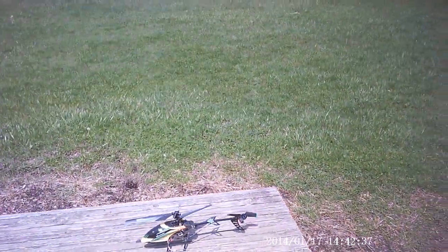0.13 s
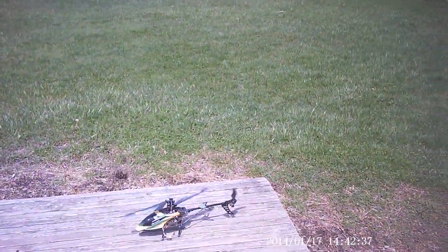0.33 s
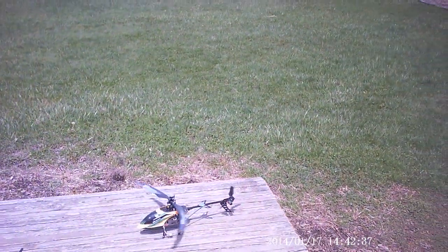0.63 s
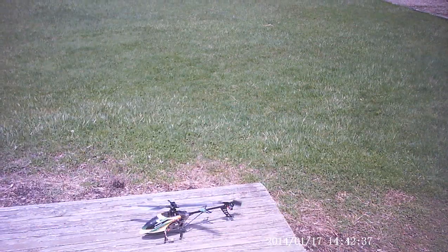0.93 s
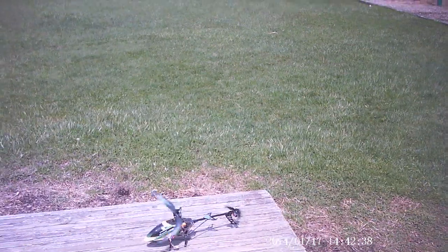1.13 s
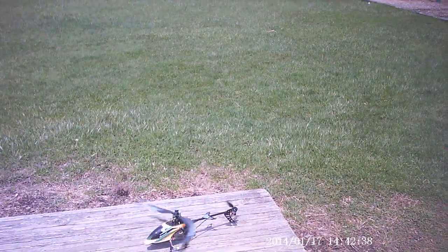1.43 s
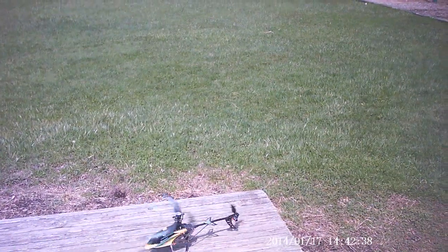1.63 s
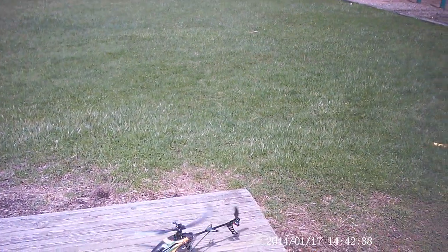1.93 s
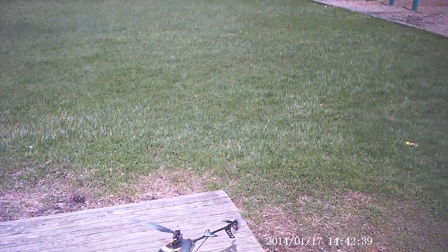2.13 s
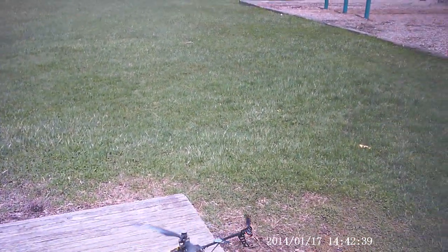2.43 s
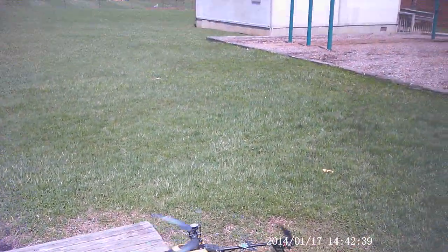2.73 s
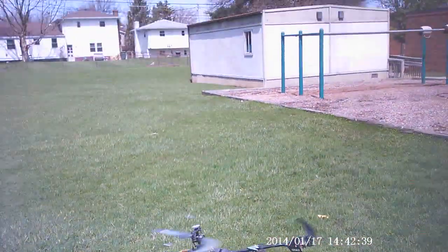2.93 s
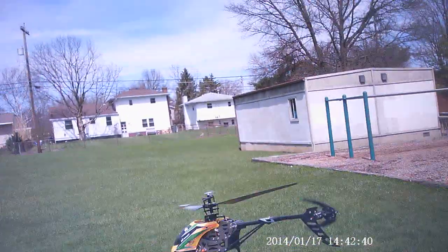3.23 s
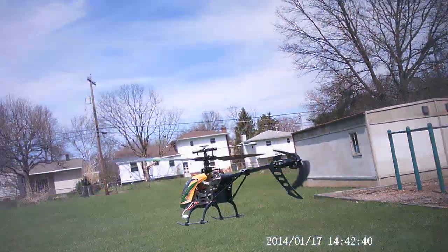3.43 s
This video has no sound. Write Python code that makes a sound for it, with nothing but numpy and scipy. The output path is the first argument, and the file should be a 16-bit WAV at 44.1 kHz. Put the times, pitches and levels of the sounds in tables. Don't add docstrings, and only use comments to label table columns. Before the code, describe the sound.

Electric toy helicopter spools up with a rising gear whine, plastic rattle and growing blade hiss.

```python
import sys
import numpy as np
from scipy import signal
from scipy.fft import rfft, irfft
from scipy.io import wavfile
from scipy.ndimage import uniform_filter1d

SR = 44100
rng = np.random.default_rng(int(sys.argv[2]) if len(sys.argv) > 2 else 0)


def store_wav(level_fs):
    pcm = np.round(np.clip(np.atleast_2d(level_fs), -1, 1) * 32767)
    wavfile.write(sys.argv[1], SR, pcm.T.astype(np.int16))


def elevation(decibels):
    levels = np.asarray(decibels, float)
    return 10 ** (levels / 20)


N = 158760
SECONDS = np.arange(N) / SR

# start_s, tooth_hz, whine_db, shaft_db, rattle_db, frame_ring_hz
DRIVE = [(0, 194.9, -86.5, -87, -87, 2600), (.25, 576, -67, -58.5, -32.5, 2626),
         (.43, 802, -50.5, -58, -39, 2896), (.485, 1096, -40.5, -70, -27, 2590),
         (.62, 1320, -39, -66.5, -29, 2720), (.78, 1568, -31.5, -54, -33, 2526),
         (1.0, 1779, -37.5, -49, -23, 2600), (1.16, 2032, -33, -54, -28.5, 2745),
         (1.27, 2281, -28, -47, -27, 2445), (1.5, 2704, -27.5, -43, -25, 2630),
         (1.78, 3002, -27.5, -44.5, -28, 2943), (1.93, 3160, -39.5, -44, -26.5, 2780),
         (2.18, 3282, -40, -40, -31, 2425), (2.6, 3323, -41, -37, -33.5, 2540),
         (3.05, 3331, -32, -35.5, -28, 2895), (3.2, 3335, -33, -33, -23, 2640),
         (3.5, 3327, -36.5, -30, -22, 2846), (3.6, 3275, -30.5, -34, -21.5, 2867)]
TEETH = 9
TAIL_RATIO = 1 / 5
CAMERA_RATE_HZ = 8000


def evened(x):
    return x / np.sqrt(np.mean(x ** 2) + 1e-20)


def curve(rows, axis=1):
    rows = np.array(rows, float)
    return uniform_filter1d(np.interp(SECONDS, rows[:, 0], rows[:, axis]), size=900)


def drift(hz):
    spectrum = rfft(rng.standard_normal(N))
    bin_hz = np.arange(len(spectrum)) * SR / N
    return evened(irfft(spectrum / (1 + (bin_hz / hz) ** 4), N))


def resonate(x, hz, width_hz):
    turn = np.exp(2j * np.pi * np.cumsum(hz * np.ones(len(x))) / SR)
    r = np.exp(-np.pi * width_hz / SR)
    return 2 * (turn * signal.lfilter([1 - r], [1, -r], x / turn)).real


def noise(points, patchy_db):
    hz = np.fft.rfftfreq(1024, 1 / SR)
    point_hz, point_db = np.transpose(points)
    real, imag, patches = rng.standard_normal((N // 256 + 5, 513, 3)).T
    patches = uniform_filter1d(patches, size=9, axis=0)
    patches = evened(uniform_filter1d(patches, size=12, axis=1))
    colour_db = np.interp(np.log(hz + 1), np.log(point_hz + 1), point_db)
    spectra = (real + 1j * imag) * elevation(colour_db[:, None] + patchy_db * patches)
    return evened(signal.istft(spectra, nperseg=1024, noverlap=768)[1][:N])


def air():
    # pitch_hz, level_db per Hz
    still_colour = [(30, -14.5), (250, -10.5), (500, -4.5), (1000, -0.5), (1900, -10.5), (2400, -12),
                    (4300, -22.5)]
    # start_s, level_db
    rumble_level = [(0, -47.5), (1.1, -42), (1.3, -37), (1.5, -35), (1.6, -38.5), (2.5, -42.5), (2.75, -40),
                    (3.0, -36.5), (3.6, -36)]
    # start_s, level_db
    hiss_level = [(0, -58), (.3, -39.5), (.6, -40), (1.1, -36), (1.5, -34), (2.5, -29.5), (3.0, -33),
                  (3.6, -29)]
    # pitch_hz, level_db per Hz
    hiss_colour = [(40, -22.5), (200, -18.5), (450, -10), (1000, -8.5), (1950, -8.5), (2250, -2.5),
                   (3400, -1), (4300, -14.5)]
    wind_colour = [(20, -8.5), (60, -0.5), (150, -2.5), (300, -7.5), (600, -39.5)]

    still = elevation(-47) * noise(still_colour, patchy_db=4.0)
    hum_hz = 85.6
    hum = resonate(resonate(rng.standard_normal(N), hum_hz, 11), hum_hz, 14)
    hum = elevation(-51.5) * evened(hum)
    rumble = elevation(curve(rumble_level) - 2.5) * noise(wind_colour, patchy_db=2.06)
    hiss = elevation(curve(hiss_level) + 9.5) * noise(hiss_colour, patchy_db=1.5)
    return still + hum + rumble + hiss


def shaft_angle():
    tooth_hz = curve(DRIVE) * (1 + .0012 * drift(25))
    return 2 * np.pi * np.cumsum(tooth_hz) / SR / TEETH


def rattle(angle):
    tooth_hz, ring_hz = curve(DRIVE), curve(DRIVE, axis=5)
    ticks_per_s = 100 + .4 * tooth_hz
    bunching = (1 + .4 * np.cos(TAIL_RATIO * angle)) * (1 + 0.28 * np.cos(angle))
    chance = bunching * ticks_per_s / SR
    size = elevation(2.5 * np.minimum(rng.exponential(1, (N, 3)), 4)) * rng.choice([-1, 1], (N, 3))
    struck = rng.random((N, 3)) < chance[:, None] * [1, 1, .3]
    ticks = struck * size / np.sqrt(ticks_per_s)[:, None]
    low = evened(resonate(resonate(ticks[:, 0], ring_hz, 300), ring_hz, 430))
    mid = evened(resonate(resonate(ticks[:, 1], 3530, 520), 3164, 480))
    top = evened(resonate(resonate(ticks[:, 2], 3790, 360), 3800, 600))
    bright = (tooth_hz / 3300) ** .6
    level = elevation(curve(DRIVE, axis=4) + 1.0 * drift(11))
    return level * (low + bright * (elevation(-2.5) * mid + elevation(-8) * top))


def knocks(rows, extra_db):
    out = np.zeros(N)
    t = np.arange(800) / SR
    for start_s, peak_db, ring_hz, ring_s in rows:
        shape = np.minimum(t / 0.00051, 1) * np.exp(-(t / np.clip(ring_s, .001, .01)) ** 2)
        phase = 2 * np.pi * ring_hz * t
        ring = np.sin(phase) + 0.12 * np.cos(.78 * phase) + 0.18 * np.sin(.37 * phase)
        out[round(start_s * SR):][:800] += elevation(peak_db + extra_db) * shape * ring
    return out


def gear_knocks():
    # start_s, peak_db, ring_hz, ring_s
    gear_hits = [(.2044, -23, 2580, .005), (.2402, -21, 2490, 0.0046), (.2507, -16, 2580, 0.0046),
                 (.2606, -13.5, 2450, 0.0033), (.2723, -11.5, 2570, 0.0049), (.2754, -11, 2830, 0.0065),
                 (.282, -15, 3360, 0.0096), (.301, -11.5, 3340, 0.0052), (.3178, -15.5, 3760, 0.0071),
                 (.4858, -19, 2630, 0.0033), (.5374, -5, 2750, 0.0016), (.5464, -14, 2780, 0.0019),
                 (.5554, -9, 2550, 0.0022), (.5805, -10, 2760, 0.0021), (.5995, -11, 2610, 0.0026),
                 (.8935, -19, 2690, 0.0052), (1.045, -5.5, 2560, 0.0044), (1.1378, -9, 2630, .004),
                 (1.4164, -15.5, 2581, 0.0034), (2.939, -5, 3550, 0.0038), (3.2, -0.5, 3550, .002),
                 (3.3095, -12, 3507, 0.0033), (3.4345, -1, 3720, .0025), (3.4724, -4, 3297, 0.005)]
    return knocks(gear_hits, extra_db=-6.0)


def frame_db(hz):
    # pitch_hz, level_db
    frame_colour = [(300, -2), (850, 5), (1180, 5), (1400, -4), (1760, 5), (2010, -4), (2160, 6), (3600, 4)]
    return np.interp(hz, *np.transpose(frame_colour))


def shaft_tones(angle):
    # order, on_deck_db, in_air_db
    orders = [(1, -4.5, -30.5), (2, -11.5, -30), (3, -9.5, -6), (4, -1, -12), (5, -1, -10), (6, -13.5, -8),
              (7, -15.5, 0.5), (8, -4, -2), (10, -4, -10.5)]
    lift_s, lift_len_s = 2.46, 1
    aloft = np.clip((SECONDS - lift_s) / lift_len_s, 0, 1)
    shaft_hz = curve(DRIVE) / TEETH
    tones = 0
    for order, deck_db, air_db in orders:
        order = round(order)
        balance_db = deck_db + (air_db - deck_db) * aloft
        level = elevation(balance_db + frame_db(order * shaft_hz) + drift(3.6))
        tones = tones + level * np.cos(order * angle + rng.uniform(0, 2 * np.pi))
    beat = 1 + 0.45 * np.cos(TAIL_RATIO * angle)
    return np.sqrt(2) * elevation(curve(DRIVE, axis=3)) * tones * beat


def cogging(angle):
    tooth_hz = curve(DRIVE)
    fade_db = 45 * np.maximum(tooth_hz - 800, 0) / 1000
    level = elevation(curve(DRIVE, axis=2) + 8 - fade_db)
    taps = 0
    for k in (3, 4):
        taps = taps + elevation(frame_db(k * tooth_hz) + 6.1 * drift(40)) * np.cos(k * TEETH * angle)
    return level * taps


def whine(angle):
    tooth_hz = curve(DRIVE)
    octave_hz = 2 * tooth_hz
    beat = (1 + .35 * np.cos(TAIL_RATIO * angle)) * (1 + .15 * np.cos(angle))
    tooth = elevation(frame_db(tooth_hz) + drift(15)) * np.cos(TEETH * angle)
    fall_db = 70 * np.maximum(octave_hz - 3560, 0) / 1000
    octave_db = -5 + frame_db(octave_hz) - fall_db
    octave = elevation(octave_db + 3.5 * drift(45)) * np.cos(2 * TEETH * angle)
    fold_db = -10 + 14.5 - 45 * abs(octave_hz - 4380) / 1000
    fold = elevation(fold_db) * (octave_hz > CAMERA_RATE_HZ / 2)
    folded = fold * np.cos(2 * np.pi * CAMERA_RATE_HZ * SECONDS - 2 * TEETH * angle)
    return np.sqrt(2) * elevation(curve(DRIVE, axis=2)) * beat * (tooth + octave + folded)


def overload_blows():
    # start_s, peak_db, ring_hz, ring_s
    hard_hits = [
        (3.2843, 1.2, 3000, .0022),
        (3.3232, -2.9, 3000, .002),
        (3.3393, .2, 3350, .0018),
        (3.3962, 1.0, 3100, .002),
        (3.4968, 1.8, 3180, .003),
    ]
    return knocks(hard_hits, extra_db=-2)


def scene():
    angle = shaft_angle()
    gears = rattle(angle) + gear_knocks() + cogging(angle) + whine(angle)
    steady = air() + gears + shaft_tones(angle)
    blows = overload_blows()
    ducking = 1 - np.minimum(2 * uniform_filter1d(abs(blows), size=30), .8)
    squashed = .62 * np.tanh(steady / .62)
    return (squashed * ducking + blows)[None]


def band_limit(x):
    return signal.sosfilt(signal.butter(12, 15850, fs=SR, output="sos"), x)


def record(dry):
    edge_hz, image_hz, image_db = 4107, 10750, -63
    offset, clip = .012, .74
    lowpass = signal.firwin(601, edge_hz, window=("kaiser", 9), fs=SR)
    band = signal.oaconvolve(dry, lowpass[None], "same")
    band = band * (1 + elevation(image_db) * np.cos(2 * np.pi * image_hz * SECONDS))
    clipped = np.clip(band + offset, -clip, clip)
    return band_limit(clipped)


dry = scene()
out = record(dry)
store_wav(out)
```